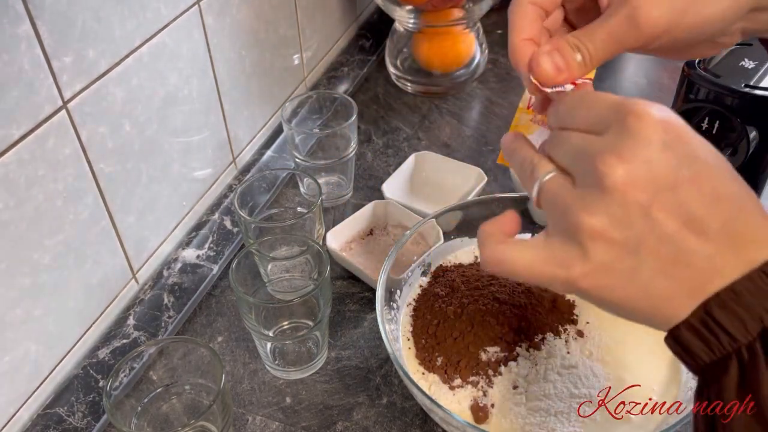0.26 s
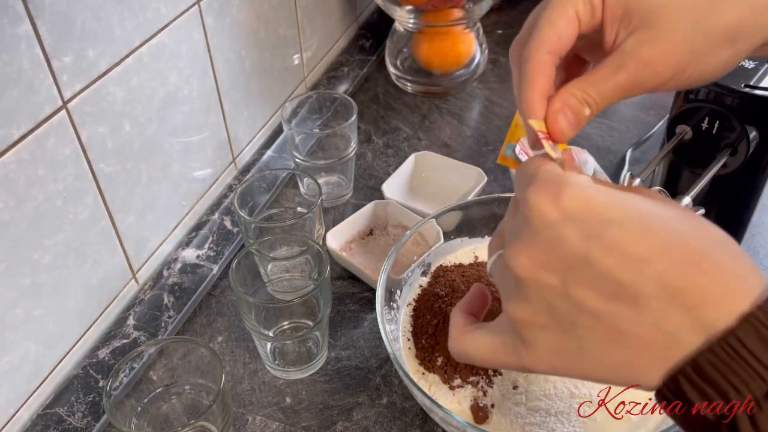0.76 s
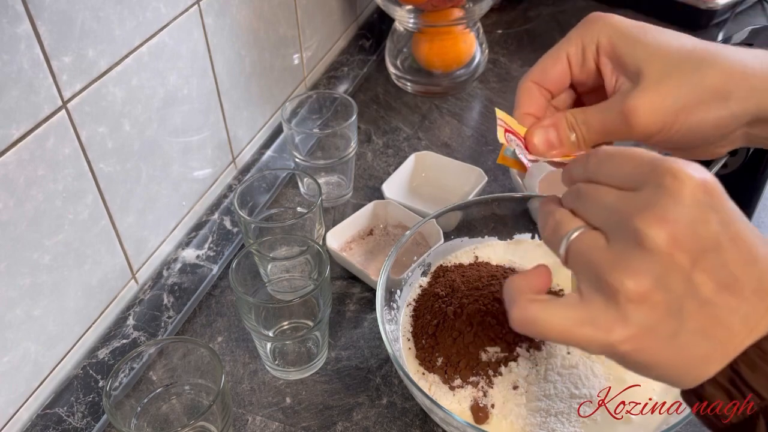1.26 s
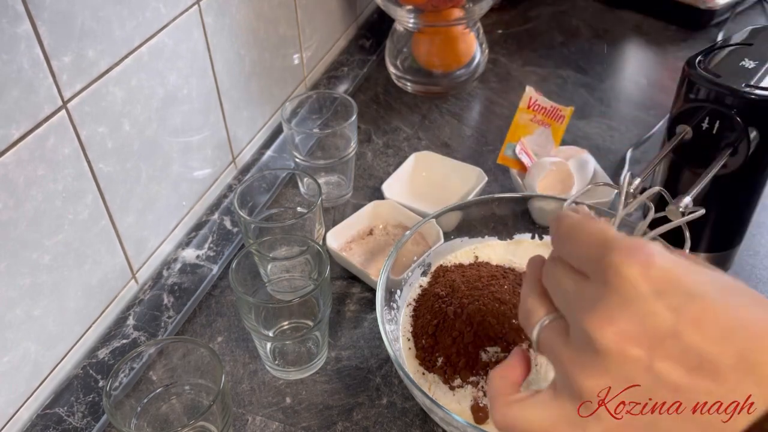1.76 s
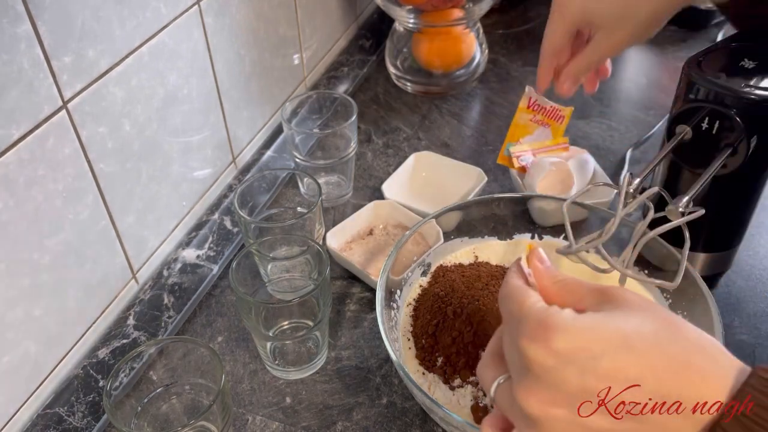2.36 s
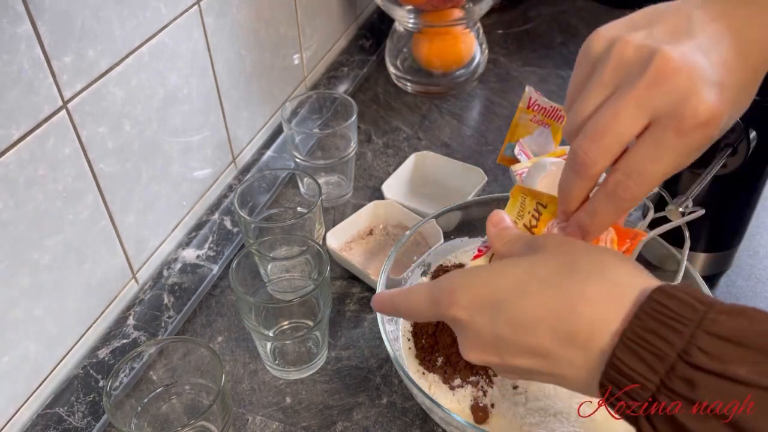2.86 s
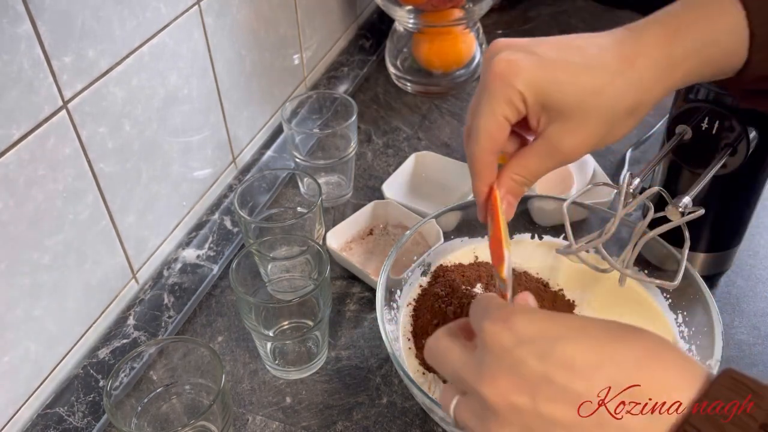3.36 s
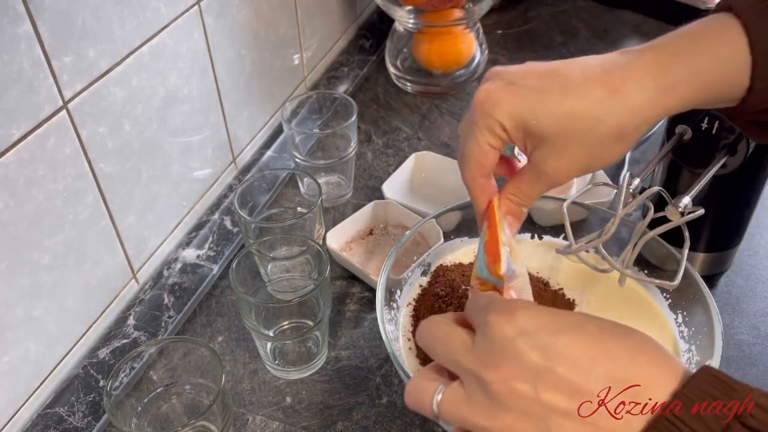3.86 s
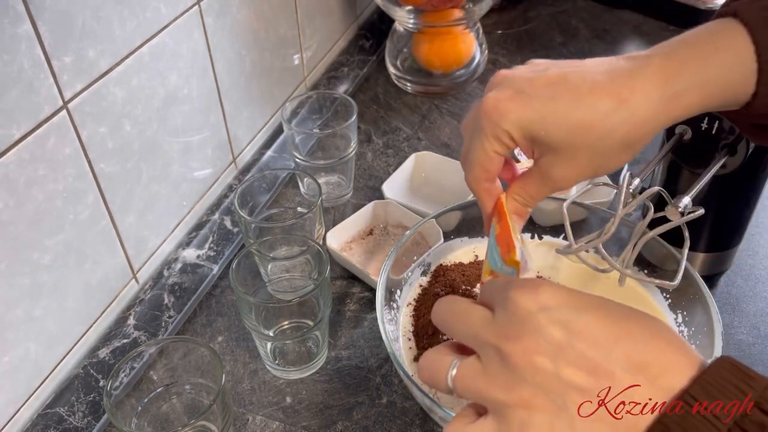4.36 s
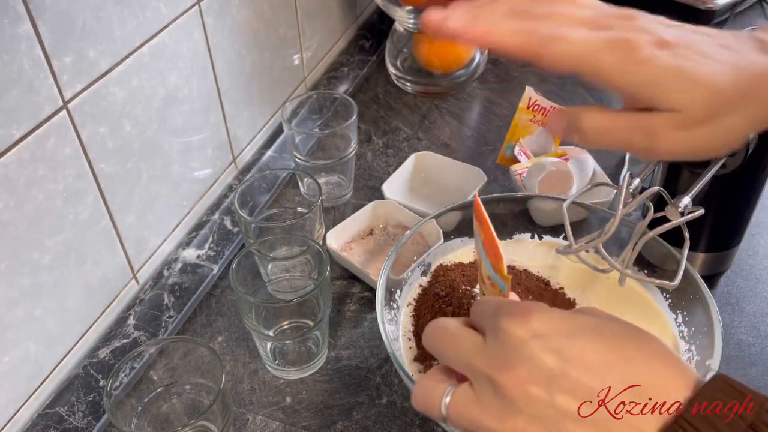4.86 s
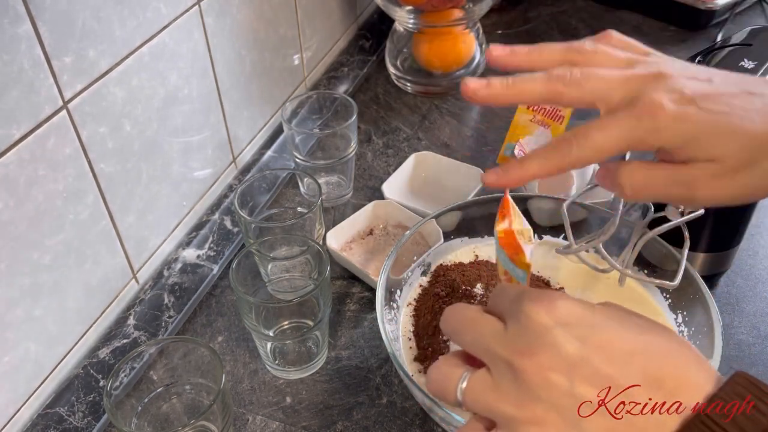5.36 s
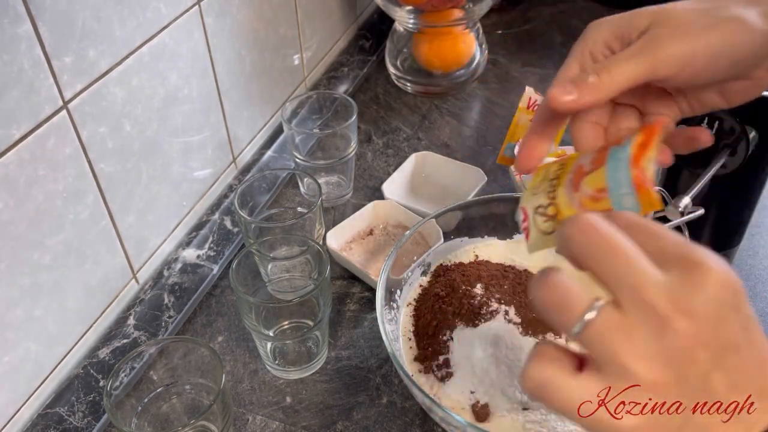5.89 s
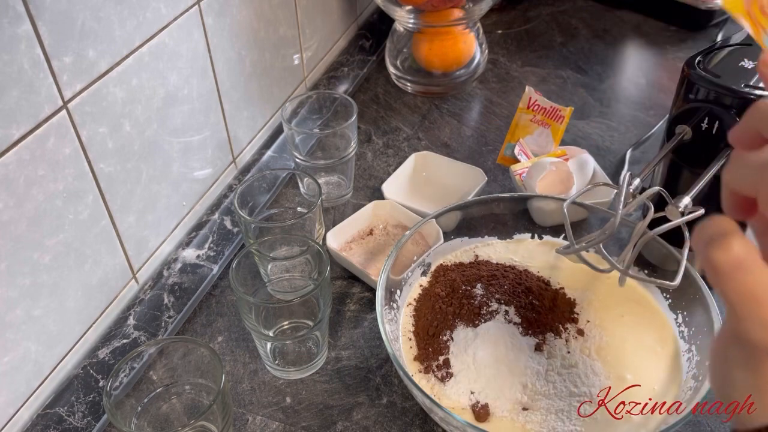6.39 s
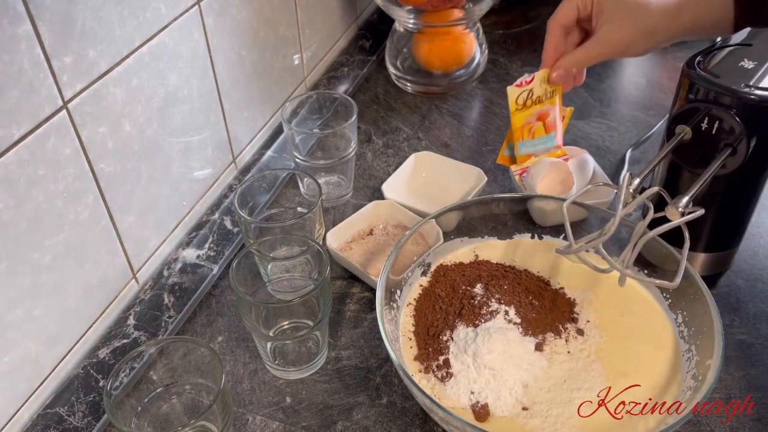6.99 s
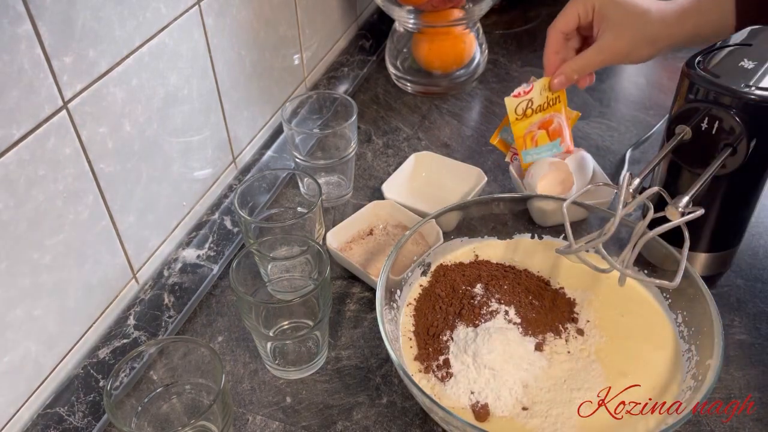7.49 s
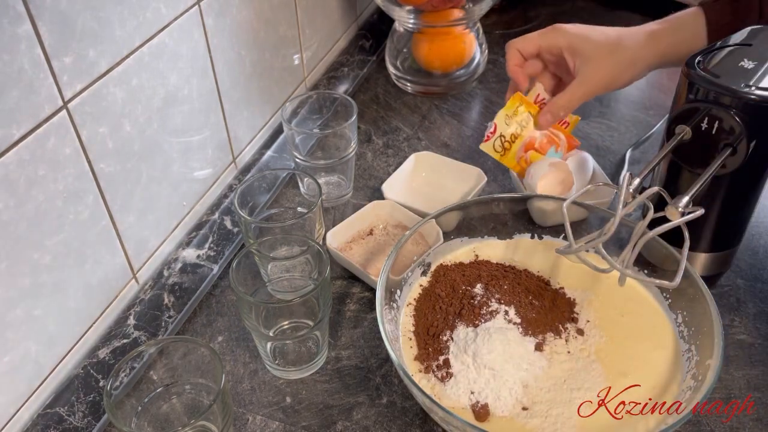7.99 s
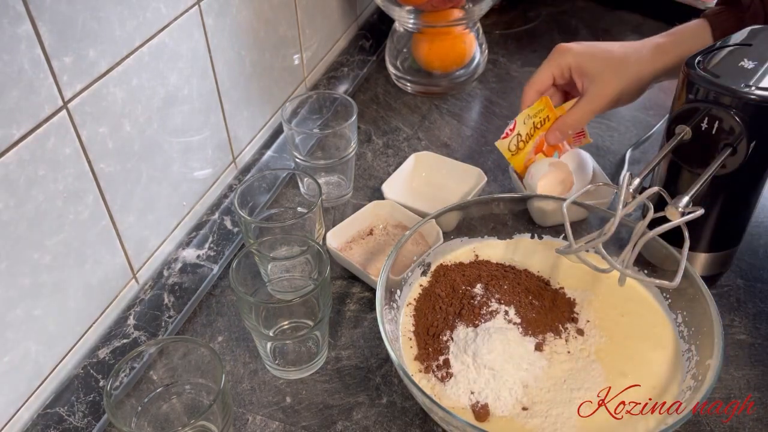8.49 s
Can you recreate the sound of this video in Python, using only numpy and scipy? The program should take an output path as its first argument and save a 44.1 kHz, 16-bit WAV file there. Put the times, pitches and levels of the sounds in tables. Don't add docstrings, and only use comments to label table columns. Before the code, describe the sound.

Close, crisp paper sachet tears and crinkles in bursts, then hollow pats on the pouch, over a low throbbing fridge in a tiled kitchen.

```python
import sys
import numpy as np
from scipy import signal
from scipy.fft import rfft, irfft, next_fast_len
from scipy.io import wavfile
from scipy.ndimage import uniform_filter1d

SR = 44100
rng = np.random.default_rng(int(sys.argv[2]) if len(sys.argv) > 2 else 0)


def voltage_ratio(decibels):
    exponent = np.asarray(decibels, float) / 20
    return 10 ** exponent


def master_out(mix):
    frames = np.transpose(np.atleast_2d(mix))
    ceiling = np.clip(frames, -1, 1)
    pcm = np.round(ceiling * 32767).astype(np.int16)
    wavfile.write(sys.argv[1], SR, pcm)


N = 385456

FLAP = signal.butter(N=3, Wn=[380, 1900], btype="band", fs=SR, output="sos")
EDGE = signal.butter(2, 5800, "high", fs=SR, output="sos")


def rms_one(x):
    return x / np.sqrt(np.mean(x ** 2) + 1e-20)


def in_time(rows):
    s, *columns = np.transpose(rows)
    return [np.interp(np.arange(N) / SR, s, c, left=-120, right=-120) for c in columns]


def at_hz(points, hz):
    point_hz, values = np.array(points)[:, 0], np.array(points)[:, 1]
    return np.interp(np.log(hz + 1), np.log(point_hz), values)


def spectrum_hz():
    size = next_fast_len(N + SR)
    return size, np.arange(size // 2 + 1) * SR / size


def band(x, low_hz, high_hz):
    edges_hz = [low_hz, min(high_hz, .45 * SR)]
    return signal.sosfilt(signal.butter(2, edges_hz, "band", fs=SR, output="sos"), x)


def resonance(x, hz, width_hz):
    r = np.exp(-np.pi * width_hz / SR)
    gain = (1 - r * r) / 2
    return signal.lfilter([gain, 0, -gain], [1, -2 * r * np.cos(2 * np.pi * hz / SR), r * r], x)


def drift(rate):
    r = np.exp(-80 * np.pi * rate / SR)
    chance = rng.standard_normal(N // 40 + 2002)
    slow = signal.lfilter([1], [1, -2 * r, r * r], chance)[2000:]
    return np.interp(np.arange(N) / 40, np.arange(len(slow)), rms_one(slow))


def swell(s, length, attack, fade_db_per_s):
    age = np.arange(N) / SR - s
    rise = np.clip(1 + age / attack, 0, 1) ** 2
    return rise * voltage_ratio(-fade_db_per_s * np.maximum(age - length, 0))


def add_at(out, s, sound):
    out[round(s * SR):][:len(sound)] += sound


def scramble(x):
    return x * rng.choice([-1, 1], len(x))


def ragged(count, spread_db, size):
    noise = rng.standard_normal(count)
    jumps_db = spread_db * rng.standard_normal(count // size + 1).repeat(size)[:count]
    return rms_one(noise * voltage_ratio(jumps_db))


def shares(flap_db, bright_db, hz):
    return flap_db - 3 * np.log2(hz / 2500), 8 + bright_db


def paper_colour(burst, low_db, high_db, hz):
    width_hz = hz * np.clip(6.7 * voltage_ratio(0.82 * high_db), .7, 2.2)
    broad = resonance(resonance(burst, hz, width_hz), hz, width_hz)
    body = broad + voltage_ratio(6) * resonance(broad, hz, hz / 4.5)
    flap = signal.sosfilt(FLAP, scramble(burst))
    edge = signal.sosfilt(EDGE, scramble(burst))
    parts = rms_one(body) + voltage_ratio(low_db + 10.0) * rms_one(flap) + voltage_ratio(high_db + 4.5) * rms_one(edge)
    return parts * np.sqrt(np.mean(burst ** 2))


# start in seconds, peak level in dB, brightness in dB, pouch pitch in Hz, burst length in seconds.
TEAR_SNAPS = [(0.063, -33.5, 7.5, 6200, 0.0076), (0.097, -42, 2, 4500, 0.0074),
              (0.112, -22.5, 4, 2586, 0.018), (0.201, -25, -13, 3980, 0.0055),
              (0.302, -38, -2, 3200, 0.059), (0.41, -41.5, -1, 2180, 0.01), (0.428, -28, 2.5, 4050, 0.01),
              (0.468, -37, -9, 3000, 0.005), (0.612, -36, -22, 3000, 0.0063),
              (0.636, -40, -29, 1670, 0.062), (0.66, -20, -9.5, 4330, 0.0084),
              (0.806, -21, 2, 3700, 0.0046), (0.91, -49.5, 12.5, 6500, 0.0044),
              (0.941, -37, 9.5, 6900, 0.0049), (1.014, -41, 9.5, 6390, 0.011),
              (1.055, -34, 6, 5370, 0.0096), (1.162, -29.5, -10, 6200, 0.0093),
              (1.21, -44.5, 9.5, 6160, 0.026), (1.237, -40, 3, 6100, 0.012), (1.252, -60, 30, 6150, 0.005),
              (1.259, -39.5, 9, 6050, 0.011), (1.3105, -44.5, 12, 6150, 0.006),
              (1.34, -48, 20, 6440, 0.0037), (1.366, -38, 3, 5470, 0.0068),
              (1.376, -33.5, -0.5, 5000, 0.007), (1.405, -42, 10, 5000, .005),
              (1.41, -19, 3.5, 6500, 0.003), (1.445, -29.5, 6, 2500, 0.0045),
              (1.457, -23.5, 0, 2490, 0.0057)]
FETCH_SNAPS = [(1.658, -54, -1, 2900, 0.0094), (2.076, -66.5, 7, 6500, 0.0097),
               (2.264, -39, -13.5, 2980, 0.0077), (2.314, -43, -27, 4800, 0.0073),
               (2.392, -48, -10, 4600, .008), (2.477, -24, 3.5, 4900, 0.0038),
               (2.567, -50.5, -1.5, 1880, 0.015), (2.674, -37, -29, 1370, 0.0035),
               (2.986, -50, -20, 1740, 0.009), (3.144, -33.5, -19, 3200, 0.0086),
               (3.382, -51.5, -3.5, 1230, 0.014), (3.539, -25, -12.5, 5370, 0.0079),
               (3.545, -30, -5, 4000, 0.0085), (3.556, -28.5, -12, 1530, 0.0092),
               (3.597, -27.5, -22.5, 3380, 0.0084), (3.61, -31, -19, 3500, 0.0069),
               (3.633, -32, -22, 2240, 0.0066), (3.664, -28, -13.5, 2490, 0.0072),
               (3.671, -35, -17, 2570, 0.012), (3.723, -23.5, -23, 2480, 0.0077),
               (3.819, -30.5, -13, 2220, 0.011), (3.878, -39, -8, 2000, 0.0075)]
PAT_SNAPS = [(4.123, -36.5, -21, 2110, 0.012), (4.201, -12, -11, 2710, 0.007),
             (4.202, -20.5, -9, 5570, 0.0066), (4.268, -23.5, -14.5, 2590, 0.0089),
             (4.374, -35.5, -38, 1260, 0.011), (4.455, -15, -4, 3120, 0.013),
             (4.508, -22.5, -11.5, 2260, 0.008), (4.522, -19.5, -12, 2120, 0.018),
             (4.563, -20, -9.5, 3930, 0.0089), (4.677, -24, -20, 2680, 0.0078),
             (4.73, -23.5, -22.5, 2850, 0.0074), (4.975, -15, -12, 2580, 0.014),
             (4.992, -15, -10, 2240, 0.015), (5.016, -22, -12.5, 3000, 0.013),
             (5.128, -8.5, -13.5, 2370, 0.012), (5.137, -6, -10, 2430, 0.01),
             (5.174, -20, -11, 1900, 0.012), (5.279, -9.5, -12.5, 2260, 0.015),
             (5.294, -29.5, -11, 2290, 0.0042), (5.331, -15, -26.5, 2290, 0.013),
             (5.439, -27.5, -10.5, 2100, 0.017), (5.453, -19.5, -43.5, 2490, 0.013)]
LAY_DOWN_SNAPS = [(5.843, -54, -19, 1548, 0.014), (6.003, -54.5, 0.5, 3570, 0.014),
                  (6.025, -53, -31, 3440, 0.034), (6.115, -35, -39, 1690, 0.0077),
                  (6.237, -22, -14.5, 1850, 0.008), (6.259, -41, -13, 2750, 0.03),
                  (6.306, -33.5, -24.5, 2620, 0.008), (7.028, -36, -17, 1830, 0.02),
                  (7.091, -26, -16, 1900, 0.0078), (7.162, -38.5, -7, 1960, 0.03),
                  (7.24, -44.5, -12, 3190, 0.039), (7.463, -44.5, 6, 2010, 0.01),
                  (7.507, -37, -22, 2100, 0.024), (7.663, -31.5, -14.5, 1730, 0.013),
                  (7.764, -44, -46, 1410, 0.011), (7.837, -46, -6, 2730, 0.092),
                  (7.863, -42, -7, 1890, 0.046), (7.907, -37, -20, 2760, 0.02),
                  (7.952, -35, -7.5, 4500, 0.016)]
CRUMPLE_SNAPS = [(8.003, -39, -8, 1460, 0.036), (8.1, -22, -14.5, 1870, 0.0081),
                 (8.121, -19, -7.5, 3570, 0.0083), (8.141, -28, -13, 2600, 0.011),
                 (8.179, -27.5, -17, 4550, 0.011), (8.213, -17.5, -2.5, 3020, 0.012),
                 (8.243, -33, 0.5, 4830, 0.012), (8.283, -35, -9, 2500, 0.021),
                 (8.369, -33.5, -5, 1760, 0.011), (8.393, -36, -4, 1700, 0.0099),
                 (8.429, -28, -5.5, 1710, 0.015), (8.458, -23, -23, 3620, 0.013),
                 (8.494, -35, 5.5, 1410, 0.011), (8.584, -23, -16.5, 1760, 0.049),
                 (8.593, -12, -8.5, 4140, 0.0072), (8.65, -23.5, -19, 2600, 0.013)]
ACTION_FLAP_DB = [
    -18,
    -18.5,
    -19.5,
    -16,
    -18.5,
]
# start in seconds, peak level in dB.
TEAR_FIBRES = [(0.9594, -40), (0.9887, -34), (1.0294, -38), (1.0829, -32), (1.1094, -40), (1.1303, -34),
               (1.1794, -40), (1.2002, -28), (1.2694, -32), (1.3394, -28), (1.3894, -32), (1.4294, -22)]


def snaps():
    out, age = np.zeros(N + SR), np.arange(SR // 16) / SR
    fibres = [(s, db - 16, 4, 6000, .004) for s, db in TEAR_FIBRES]
    actions = [TEAR_SNAPS + fibres, FETCH_SNAPS, PAT_SNAPS, LAY_DOWN_SNAPS, CRUMPLE_SNAPS]
    for action, flap_db in zip(actions, ACTION_FLAP_DB):
        for s, peak_db, bright_db, hz, length in action:
            flutter = voltage_ratio(-34.5 - 20 * age / 0.062)
            shape = np.minimum(age / 0.00074, 1) * (voltage_ratio(-20 * age / max(length, .001)) + flutter)
            burst = ragged(len(age), 1.0, size=16) * shape * voltage_ratio(peak_db - 11.0)
            add_at(out, s, paper_colour(burst, *shares(flap_db, bright_db, hz), hz))
    return out[:N]


# start in seconds, length in seconds, rms level in dB, brightness in dB, pouch pitch in Hz.
RIPS_AND_SLIDES = [(0.928, 0.33, -77, 21.5, 4660), (1.411, 0.029, -49, 3.5, 2980),
                   (1.818, 0.044, -38.5, -17.5, 1820), (2.758, 0.05, -67, 7.5, 4400),
                   (6.541, 0.061, -64.5, -2, 3700), (2.914, 0.038, -66, 7.5, 2870),
                   (4.644, 0.027, -61, 0, 4740), (7.045, 0.11, -58, 3.5, 2020),
                   (7.42, 0.15, -57.5, -3, 2980), (3.389, 0.083, -67.5, -3.5, 610),
                   (5.335, 0.039, -55, -22, 2210), (5.462, 0.094, -62.5, -25.5, 2413),
                   (8.351, 0.11, -54, -11, 1760)]


def strokes():
    out, age = np.zeros(N + SR), np.arange(SR // 2) / SR
    for s, length, level_db, bright_db, hz in RIPS_AND_SLIDES:
        shape = np.minimum(age / 0.0085, 1) * voltage_ratio(-.15 * hz * np.maximum(age - length, 0))
        stutter = voltage_ratio(2.55 * rng.standard_normal(len(age) // 150 + 1)).repeat(150)[:len(age)]
        rip = voltage_ratio(level_db - 6.0) * shape * stutter * ragged(len(age), 1.3, size=24)
        add_at(out, s, paper_colour(rip, *shares(-13.5, bright_db, hz), hz))
    return out[:N]


RUB_DB, RUB_LOSS = -6, 0.13
# time in seconds, effort in dB, brightness in dB, pouch pitch in Hz.
HAND_HOLD = [(0, -53.5, -3.5, 2616), (1.3, -66.5, 12.5, 3850), (1.6, -67.5, -46, 2165),
             (2.0, -54, -8.5, 2510), (2.1, -81, -6, 1795), (2.25, -78, 12, 1806), (2.33, -59.5, -1, 3185),
             (3.1, -66.5, 12.5, 2990), (3.3, -75.5, 6, 2874), (3.75, -62.5, -1, 2600),
             (4.06, -93, -8.5, 2300), (4.6, -64, 0, 3040), (4.88, -82.5, 1, 2840), (5.36, -65, -12.5, 2357),
             (5.72, -86, -6, 2250), (6.72, -55, -2, 2750), (6.85, -61, 1, 2777), (7.35, -64, -10, 2630),
             (7.8, -57.5, -3.5, 2035), (8.74, -49, -1, 2685)]
# start in seconds, length in seconds, effort in dB, brightness in dB, pouch pitch in Hz.
FINGER_SQUEEZES = [(0.135, 0.011, -56.5, 14.5, 3370), (0.413, 0.089, -49, 2.5, 2247),
                   (0.65, 0.083, -59, 7, 4060), (0.96, 0.19, -59, -5, 2305),
                   (1.326, 0.11, -54.5, 10.5, 3525), (1.655, 0.13, -91, 30.5, 2830),
                   (2.473, 0.036, -63, -6, 4065), (2.93, 0.03, -62, 6, 2095), (2.97, 0.03, -67.5, 4, 2500),
                   (3.021, 0.041, -64, 6.5, 3000), (3.536, 0.12, -53, -9, 2895),
                   (3.767, 0.13, -53.5, 1.5, 2337), (4.187, 0.19, -58, -21, 2320),
                   (4.448, 0.25, -52.5, -22, 2280), (5.14, 0.047, -43.5, -2, 2400),
                   (5.312, 0.13, -63, -7, 2273), (6.009, 0.057, -58, -6.5, 3790),
                   (6.104, 0.13, -58, -9, 1844), (6.404, 0.091, -62, -2.5, 2404),
                   (6.58, 0.19, -70, 4.5, 2700), (6.903, .09, -62.5, 0.5, 3500),
                   (7.038, 0.12, -56.5, 3.5, 1910), (7.407, 0.036, -58, -4, 2975),
                   (7.769, 0.11, -58.5, -4.5, 1977), (8.114, 0.048, -42.5, -16, 3050),
                   (8.357, 0.05, -46.5, 2.5, 1792), (8.551, 0.025, -50.5, -28, 2735)]


def hands():
    effort_db, bright_db, pitch_hz = in_time(HAND_HOLD)
    moves = [(voltage_ratio(effort_db - 2.0), bright_db, pitch_hz)]
    for s, length, db, bright, hz in FINGER_SQUEEZES:
        squeeze = swell(s, length, attack=0.0065, fade_db_per_s=167)
        moves.append((voltage_ratio(db) * squeeze, bright, hz))
    gains = [sum(gain * voltage_ratio(k * bright) for gain, bright, _ in moves) for k in (1, 0, -RUB_LOSS)]
    total_power = sum(gain ** 2 for gain, _, _ in moves)
    return gains, sum(gain ** 2 * hz for gain, _, hz in moves) / total_power


def crackle(per_s, spread_db, smooth_db):
    sizes = voltage_ratio(spread_db * np.minimum(rng.exponential(1, N), 5)) * rng.choice([-1, 1], N)
    born = rng.random(N) < per_s * voltage_ratio(3.0 * drift(70)) / SR
    return rms_one(rms_one(sizes * born) + voltage_ratio(smooth_db) * rng.standard_normal(N))


def pouch(x, pitch_hz):
    hollow, state = np.zeros(N), np.zeros(2)
    r = np.exp(-np.pi * 400 / SR)
    for i in range(0, N, 256):
        hz = np.clip(pitch_hz[i], 500, 9000)
        poles = [1, -2 * r * np.cos(2 * np.pi * hz / SR), r * r]
        hollow[i:i + 256], state = signal.lfilter([1, 0, -1], poles, x[i:i + 256], zi=state)
    return voltage_ratio(-.5) * rms_one(hollow) + rms_one(band(scramble(x), 1300, 6200))


def rustle():
    (crisp, body, soft), pitch_hz = hands()
    grains = crackle(per_s=1800., spread_db=2.2, smooth_db=-3.0)
    grains = grains * voltage_ratio(2.3 * drift(25))
    bright = crisp * voltage_ratio(-3.5) * rms_one(signal.sosfilt(EDGE, scramble(grains)))
    rub = soft * voltage_ratio(RUB_DB - 7.5) * rms_one(signal.sosfilt(FLAP, scramble(grains)))
    hollow = body * voltage_ratio(-10.5) * rms_one(pouch(grains, pitch_hz))
    return bright + hollow + rub


FOLD_Q = 9.0
FOLD_ATTACK_S, FOLD_FADE_DB_PER_S = 0.017, 344
# start in seconds, length in seconds, rms level in dB, pitch in Hz, glide in Hz per second.
SINGING_FOLDS = [(4.12, 0.02, -63, 2450, -6000), (6.468, .03, -67, 940, 2), (6.59, .03, -71, 1900, 3),
                 (6.67, 0.099, -71, 2600, 2500), (6.904, 0.075, -70.5, 1850, -300),
                 (6.894, 0.13, -67, 2830, 498), (7.031, 0.11, -60.5, 1800, 4),
                 (7.09, 0.06, -60, 4350, 3000), (7.087, 0.07, -59, 6000, -1),
                 (7.345, 0.063, -70, 4450, 1500), (7.41, .03, -56, 4400, 1), (7.416, 0.027, -67, 1750, 0),
                 (7.471, 0.063, -60, 1950, -500), (7.49, 0.03, -57, 4400, 0), (7.455, .08, -66, 6050, 0),
                 (7.783, .03, -79, 2340, 2), (7.8, 0.12, -68, 4700, -500), (7.853, 0.07, -58.5, 1880, 302),
                 (7.838, .13, -71, 2720, 0), (3.76, 0.16, -73, 2520, 3), (3.766, 0.15, -66.5, 3490, 0),
                 (8.36, 0.11, -58.5, 1780, 4)]


def folds():
    out, age = np.zeros(N + SR), np.arange(SR // 2) / SR
    for s, length, level_db, hz, glide in SINGING_FOLDS:
        rubbing = ragged(len(age), 4.5, size=300)
        still = resonance(resonance(rubbing, hz, hz / FOLD_Q), hz, hz / FOLD_Q)
        tone = np.real(signal.hilbert(still) * np.exp(1j * np.pi * glide * age ** 2))
        shape = np.minimum(age / FOLD_ATTACK_S, 1) * voltage_ratio(-FOLD_FADE_DB_PER_S * np.maximum(age - length, 0))
        add_at(out, s - FOLD_ATTACK_S / 2, voltage_ratio(level_db) * shape * rms_one(tone))
    return out[:N]


# start in seconds, peak level in dB, pitch in Hz.
KNOCKS_AND_BOOMS = [(0.117, -41, 324), (0.309, -54, 422), (0.641, -42, 800), (2.676, -44.5, 950),
                    (3.418, -50, 616), (3.552, -53, 330), (3.652, -46, 350), (3.673, -37.5, 950),
                    (3.728, -38.5, 550), (4.268, -37, 706), (4.465, -38, 810), (4.525, -43, 600),
                    (4.98, -34, 252), (4.993, -18.5, 900), (5.133, -33, 277), (5.144, -20, 870),
                    (5.187, -36.5, 302), (5.287, -32, 900), (5.335, -61, 900), (7.09, -38.5, 395),
                    (7.17, -42, 398), (7.667, -37, 450), (7.77, -52, 595), (7.669, -42.5, 765),
                    (7.91, -44, 330), (8.004, -45, 330), (8.216, -38, 396), (8.598, -47, 450),
                    (0.445, -35, 139), (0.49, -37, 106), (0.925, -42, 62), (0.99, -40.5, 58.4),
                    (4.523, -28.5, 910), (4.53, -36, 328), (4.564, -34.5, 950), (4.27, -40.5, 331),
                    (4.74, -44, 110)]


def knocks():
    out, age = np.zeros(N + SR), np.arange(SR // 10) / SR
    for s, peak_db, hz in KNOCKS_AND_BOOMS:
        turns = age * hz
        shape = voltage_ratio(peak_db - 60 * turns / 6.6 / 2) * np.minimum(turns, 1)
        add_at(out, s, shape * np.sin(2 * np.pi * turns + rng.uniform(0, 6)))
    return out[:N]


# start in seconds, peak level in dB, brightness in dB, pouch pitch in Hz, burst length in seconds.
PAPER_TICKS = [(0.95, -42, 8.5, 6500, 0.013), (2.635, -67.5, 22.5, 8000, 0.011),
               (2.614, -49, -30, 1100, .006), (2.979, -45, 0, 4500, .005), (5.737, -60.5, -10, 2490, .012),
               (6.144, -43, -7, 2500, .005), (6.184, -54, 0, 4000, .005), (6.265, -36, -6, 2800, .005),
               (7.418, -42, -10, 4400, .008), (7.5, -38, -10, 4400, .006), (8.03, -45, 0, 5000, .005)]


def ticks():
    out, age = np.zeros(N + SR), np.arange(SR // 16) / SR
    for s, peak_db, bright_db, hz, length in PAPER_TICKS:
        shape = np.minimum(age / 0.0007, 1) * voltage_ratio(peak_db - 12.5 - 20 * age / max(length, .001))
        burst = ragged(len(age), 1.2, size=16) * shape
        add_at(out, s, paper_colour(burst, *shares(-14, bright_db, hz), hz))
    return out[:N]


# start in seconds, length in seconds, rms level in dB.
FOIL_FIZZ = [(0.94, 0.3, -42), (1.21, 0.07, -53), (1.32, 0.01, -39), (1.371, 0.03, -52),
             (1.403, 0.038, -40), (8.36, 0.1, -55)]


def fizz():
    high = signal.butter(N=4, Wn=10900, btype="high", fs=SR, output="sos")
    top = signal.sosfilt(high, ragged(N, 3.0, size=200))
    return rms_one(top) * sum(voltage_ratio(db) * swell(s, length, .006, 300) for s, length, db in FOIL_FIZZ)


# start in seconds, length in seconds, rms level in dB, top of the scrape in Hz.
WORKTOP_NUDGES = [(2.058, .035, -54, 1700), (3.59, .08, -64, 500), (6.24, .05, -62, 500),
                  (7.04, .12, -63, 500), (7.8, .2, -63, 480), (1.45, .1, -66, 900), (8.1, .1, -62, 500),
                  (8.58, .06, -58, 500)]


def nudge():
    scrape, out = band(rng.standard_normal(N), 197, 970), 0
    for s, length, level_db, top_hz in WORKTOP_NUDGES:
        dull = signal.sosfilt(signal.butter(N=6, Wn=top_hz, fs=SR, output="sos"), scrape)
        out = out + voltage_ratio(level_db) * swell(s, length, attack=.006, fade_db_per_s=110) * rms_one(dull)
    return out


# start in seconds, boom level in dB, shudder level in dB, length in seconds.
WORKTOP_THUDS = [(0.525, -69, -47.5, 0.1), (0.617, -51, -65, 0.056), (0.867, -58, -62, 0.018),
                 (1.855, -56, -69, 0.034), (2.076, -42, -60, 0.049), (2.191, -39, -45, 0.026),
                 (2.312, -62, -59.5, 0.2)]


def thuds():
    boom = rms_one(band(band(rng.standard_normal(N), 106, 204), 106, 204))
    shudder = rms_one(band(band(rng.standard_normal(N), 42, 91), 42, 91))
    out = 0
    for s, boom_db, shudder_db, length in WORKTOP_THUDS:
        lean = swell(s, length, attack=0.048, fade_db_per_s=214)
        out = out + lean * (voltage_ratio(boom_db) * boom + voltage_ratio(shudder_db) * shudder)
    return out


# frequency in Hz, time to fall 60 dB in seconds.
TILE_ECHO = [(200, 0.46), (2000, 0.27), (6000, 0.3), (12000, 0.19)]


def kitchen(x):
    size, hz = spectrum_hz()
    age, tail = np.arange(SR // 2) / SR, 0
    build_up = np.clip(age / 0.011 - .3, 0, 1)
    echoes = rng.standard_normal((2, SR // 2)) * build_up * voltage_ratio(-23.0)
    for k, (_, t60) in enumerate(TILE_ECHO):
        share = at_hz([(f, j == k) for j, (f, _) in enumerate(TILE_ECHO)], hz)
        tail = tail + share * rfft(echoes * voltage_ratio(-60 * age / t60), size)
    return irfft(tail * rfft(x, size), size)[:, :N]


MAINS_HZ, ROTOR_HZ, FIRST_NULL_S = 99.99, 97.05, .30
# frequency in Hz, rms level in dB.
FRIDGE_ORDERS = [(48.55, -78), (73.9, -66), (145.6, -70), (200, -78), (300, -81)]


def fridge():
    t = np.arange(N) / SR - FIRST_NULL_S
    out = voltage_ratio(-55.0) * np.sin(2 * np.pi * MAINS_HZ * t) - voltage_ratio(-58.0) * np.sin(2 * np.pi * ROTOR_HZ * t)
    for hz, level_db in FRIDGE_ORDERS:
        waver_db = 3.2 * drift(3)
        out += voltage_ratio(level_db + 3 + waver_db) * np.sin(2 * np.pi * hz * t + 0.73 * drift(0.92))
    return out


AIR_DB = -55.5
# frequency in Hz, level in dB per Hz.
AIR_COLOUR = [(15, -40), (30, -20.5), (55, -4), (110, -15), (200, -18), (320, -31), (700, -36), (1400, -43),
              (3000, -57), (9000, -53), (16000, -57.5)]


def air():
    size, hz = spectrum_hz()
    noise = rfft(rng.standard_normal((2, size)))
    return voltage_ratio(AIR_DB - 1.0) * rms_one(irfft(noise * voltage_ratio(at_hz(AIR_COLOUR, hz)), size)[:, :N])


def scene():
    paper = snaps() + strokes() + rustle() + folds()
    taps = knocks()
    paper = paper + nudge() + ticks() + fizz()
    echo = voltage_ratio(-13) * kitchen(paper + voltage_ratio(-5.5) * taps)
    return paper + taps + echo + thuds() + fridge() + air()


def top_gate(x, edge_hz, open_db, db_per_khz, follows, fickle_db):
    turn = np.array([[1, 1], [1, -1]]) / np.sqrt(2)
    hz, _, cells = signal.stft(turn @ x, SR, nperseg=512)
    level = uniform_filter1d(uniform_filter1d(np.abs(cells) ** 2, size=5, axis=1), size=5, axis=2)
    middle_db = 10 * np.log10(level[0, 12:100].mean(axis=0) + 1e-14) + 92
    patches = np.kron(rng.standard_normal((44, len(middle_db) // 8 + 1)), np.ones((6, 8)))
    patches = patches[:len(hz), :len(middle_db)]
    height_khz = (np.minimum(hz, 12500)[:, None] - edge_hz) / 1000
    needed_db = open_db + db_per_khz * height_khz + follows * np.minimum(middle_db, 25) + fickle_db * patches
    keep = (level > voltage_ratio(2 * needed_db)) | (hz < 9700)[:, None]
    return turn @ signal.istft(cells * keep, SR, nperseg=512)[1][:, :N]


def band_limit(x):
    return signal.sosfilt(signal.butter(12, 17160, fs=SR, output="sos"), x)


# frequency in Hz, gain in dB.
CAPSULE_GAIN = [(200, 0.5), (4000, 0.5), (7000, -1.5), (8500, 2), (10300, 8.5), (11300, 2.5), (12100, -8.5),
                (12800, -11), (13700, -24), (15000, -23.5), (15900, -23.5), (16600, -52)]
# frequency in Hz, lead in radians.
LEFT_PHASE = [(100, 0), (1700, -.3), (2400, .5), (3500, .8), (7900, .8), (8600, -.1), (10300, -3.3),
              (12060, -6.2), (12750, -6.8), (13400, -9.3), (14100, -9.5), (14800, -12.5)]
# frequency in Hz, side gain in dB.
SIDE_GAIN = [(60, -23.5), (130, -14), (300, 0.5), (2000, 3), (7000, -7.5), (9000, -13.5), (15000, -6.5)]
# frequency in Hz, left over right in dB.
LEFT_OVER_RIGHT = [(60, -0.5), (170, 3), (330, -5), (650, 2), (1000, 2), (5500, 3.5), (8500, 1),
                   (15000, -2.5)]


def record(dry):
    size, hz = spectrum_hz()
    left, right = rfft(dry, size) * voltage_ratio(at_hz(CAPSULE_GAIN, hz))
    mid = (left + right) / 2
    side = (left - right) / 2 * voltage_ratio(at_hz(SIDE_GAIN, hz))
    tilt = voltage_ratio(at_hz(LEFT_OVER_RIGHT, hz) / 2)
    left_port = (mid + side) * tilt * np.exp(1j * at_hz(LEFT_PHASE, hz))
    right_port = (mid - side) / tilt
    ports = irfft(np.array([left_port, right_port]), size)[:, :N]
    mix = top_gate(ports, edge_hz=9900, open_db=-98, db_per_khz=2.5, follows=0.69, fickle_db=7.0)
    return band_limit(mix)


dry = scene()
out = record(dry)
master_out(out)
```